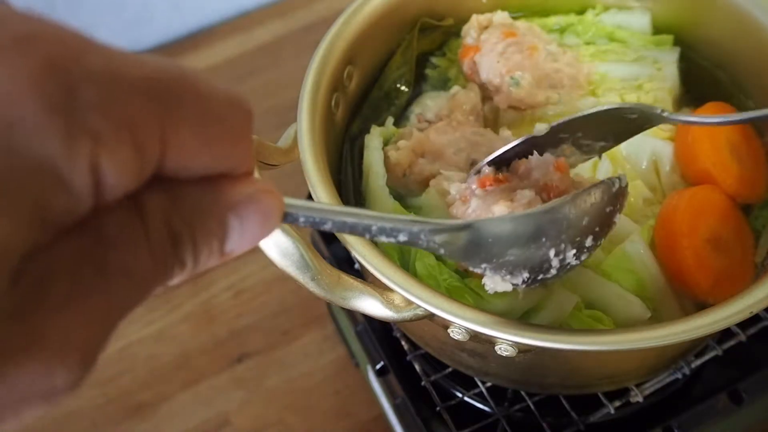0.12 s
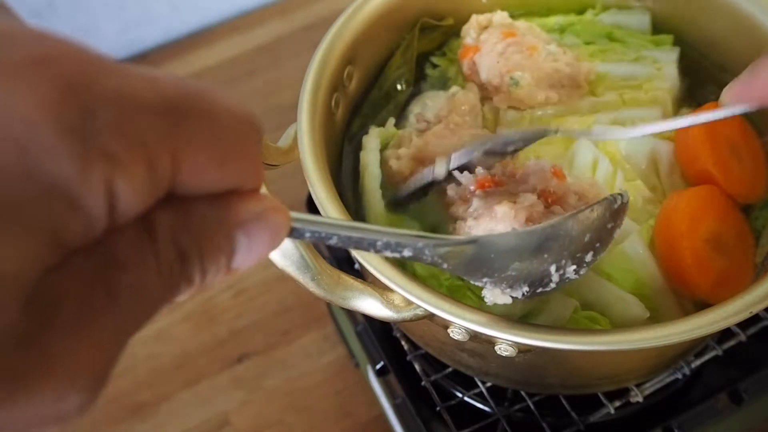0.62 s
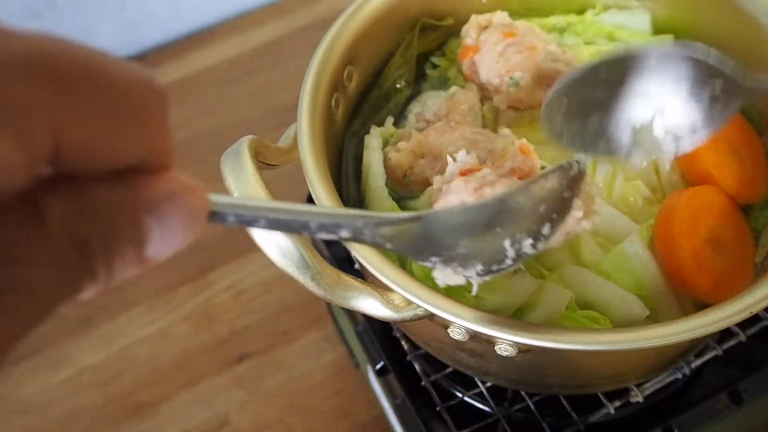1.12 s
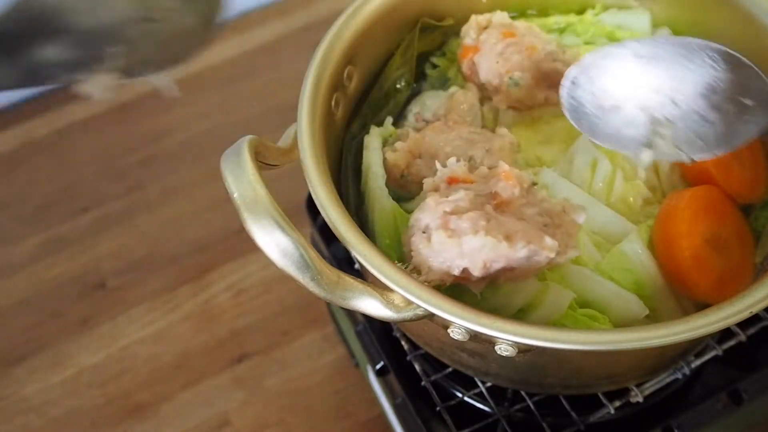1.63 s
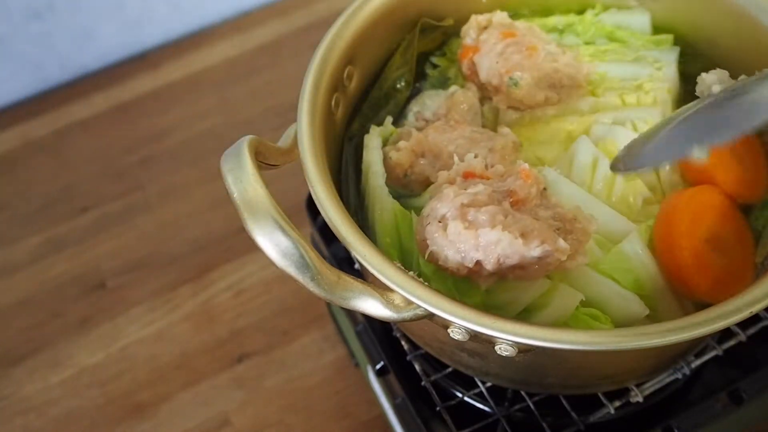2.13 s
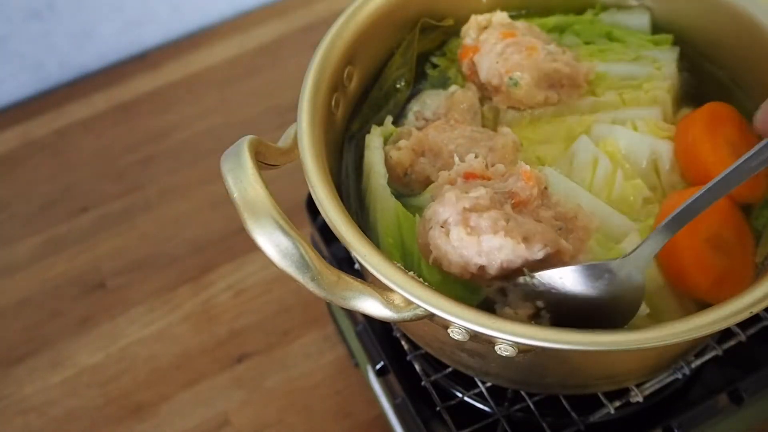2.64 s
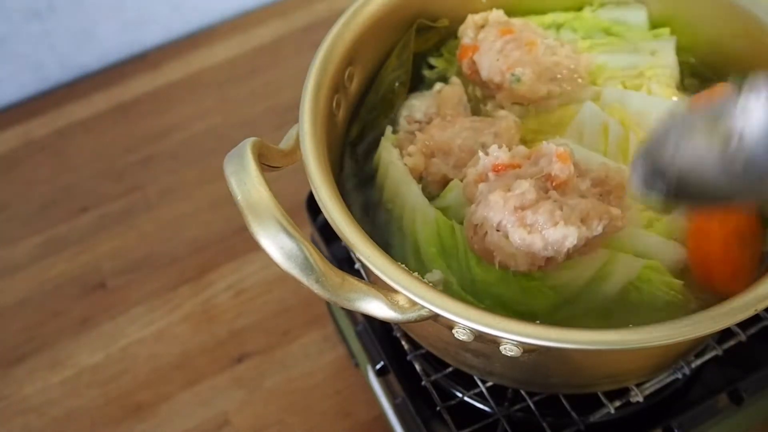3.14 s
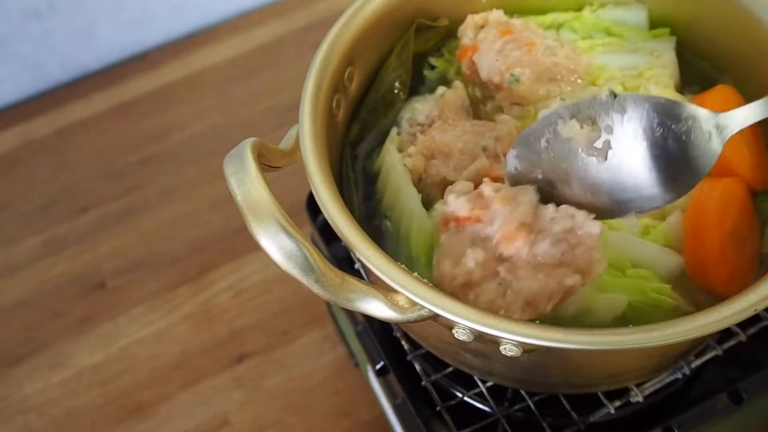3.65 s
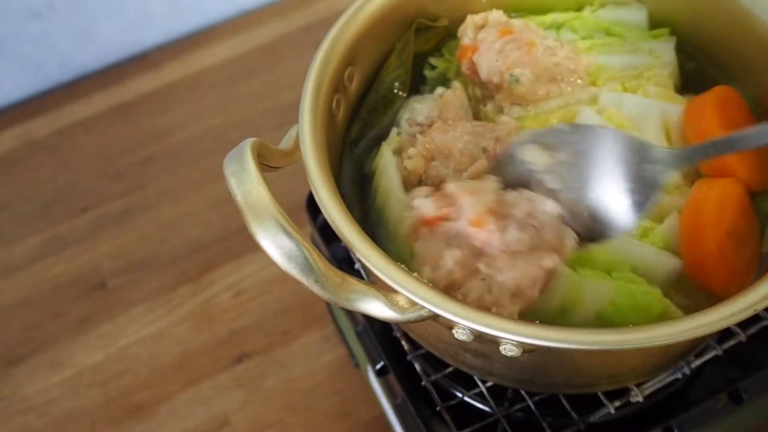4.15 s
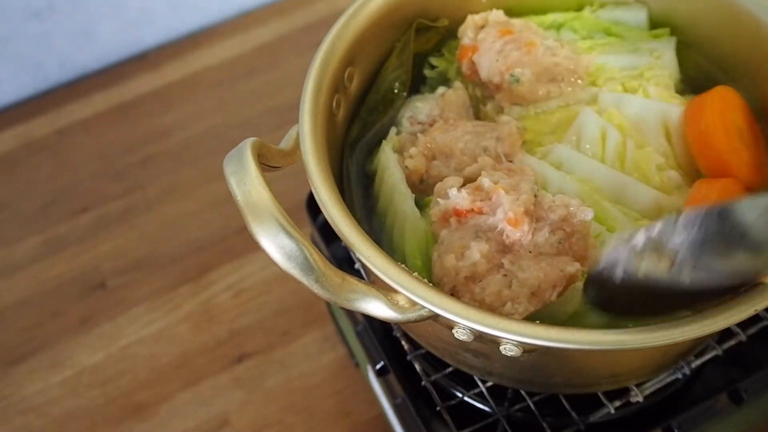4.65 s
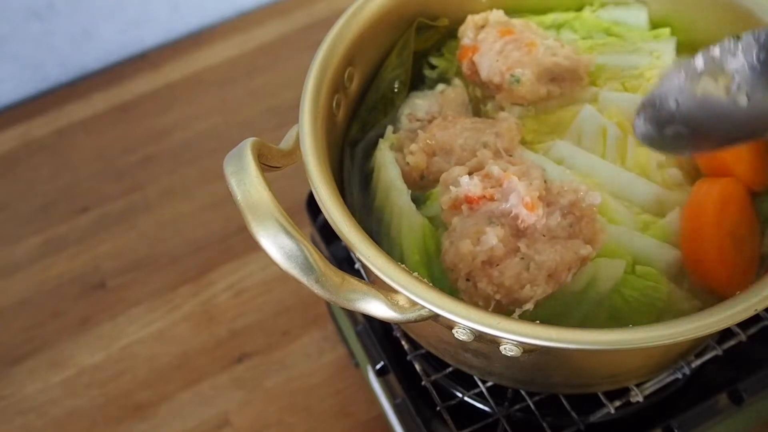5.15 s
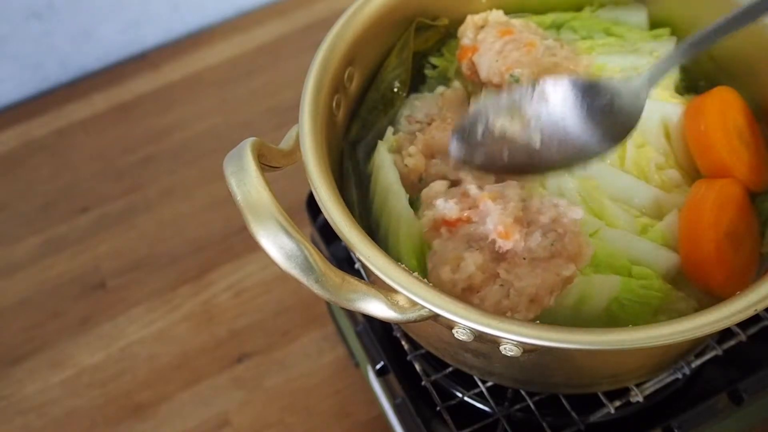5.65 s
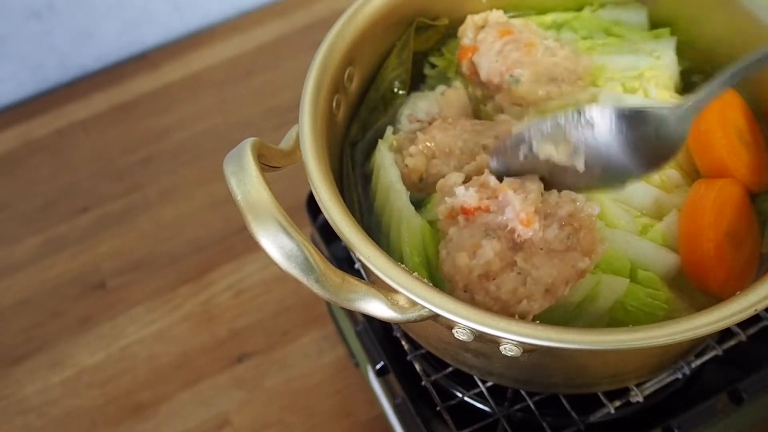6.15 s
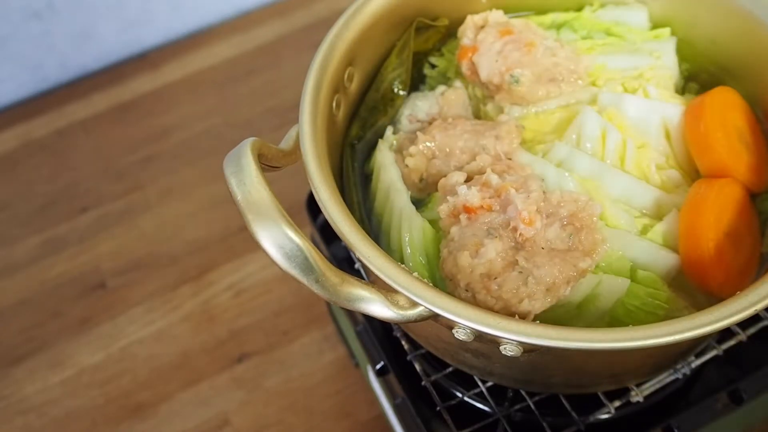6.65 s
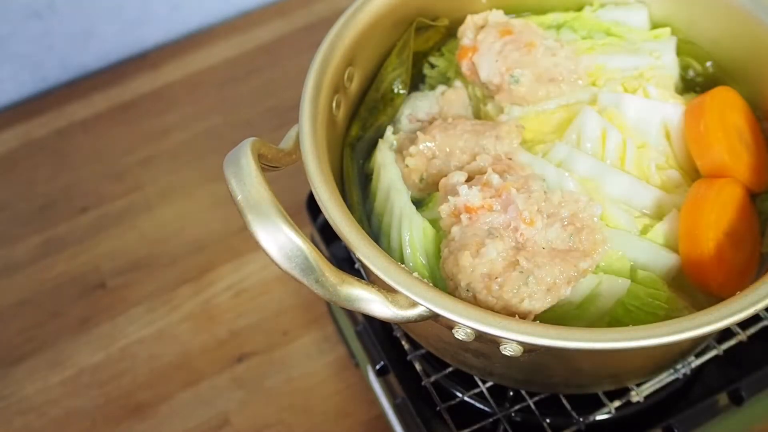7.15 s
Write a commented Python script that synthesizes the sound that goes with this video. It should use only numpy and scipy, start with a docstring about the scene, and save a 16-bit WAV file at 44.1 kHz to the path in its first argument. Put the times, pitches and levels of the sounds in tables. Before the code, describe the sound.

Close to a small pot simmering over a gas flame: steady low roar, tiny pops, and a few spoon scrapes and sharp metallic knocks.

```python
"""Simmering pot on a gas burner

Vegetables come to a simmer over a tabletop burner, heard from close by. The flame roars low as filtered
noise, gas jets whistle faintly as narrow noise bands, and bubbles pop as short damped oscillations.
A metal spoon knocks the aluminium wall and another spoon, which ring as sums of decaying modes;
its scrapes along the inside are stick-slip noise through the resonances of the hollow pot, with grit above.
"""
import sys
import numpy as np
from scipy import signal
from scipy.fft import rfft, irfft
from scipy.io import wavfile
from scipy.ndimage import uniform_filter1d

SR = 44100
rng = np.random.default_rng(int(sys.argv[2]) if len(sys.argv) > 2 else 0)


def pcm_store(signal):
    """Save signal as 16-bit PCM."""
    levels = np.round(np.clip(np.atleast_2d(signal), -1, 1) * 32767)
    wavfile.write(sys.argv[1], SR, levels.astype(np.int16).T)


def makeup_ratio(level_db):
    """Linear amplitude ratio for a level in decibels (20 dB per factor of ten)."""
    decades = np.asarray(level_db, float) / 20
    return 10 ** decades


N = 321048

# Flame roar and simmer hiss before flicker, with an upper cut-off at 16 kHz:
# f/Hz, left level/dB per Hz, right level/dB per Hz, likeness/0-1
FLAME_SPECTRUM = [(25, -87, -87, 0.7), (58.7, -78.5, -75.5, 0.4), (103, -72, -74, 0.82),
                  (148, -66, -66, 0.95), (240, -84.5, -87.5, 0.45), (308, -83.5, -83, 0.47),
                  (673, -87.5, -89, 0.6), (752, -80.5, -79.5, 0.38), (934, -83.5, -81.5, 0.52),
                  (1245, -88, -87, 0.26), (2070, -91, -91.5, 0.52), (2400, -95, -95.5, 0),
                  (2680, -93.5, -93, 0.1), (3600, -91, -92.5, 0), (5900, -97, -97, 0.19),
                  (7050, -92.5, -93.5, 0.24), (9400, -93, -98, 0), (12700, -99, -93, 0),
                  (12800, -101, -105, 0.4), (14000, -87, -80, 0.27), (14400, -102, -94, 0.3),
                  (15800, -99, -99, 0.2), (16000, -125, -125, 0.1)]
# Slow small wavering of the pot's hum: t/s, level change/dB
HUM_WAVER = [(0, -0.5), (2.5, 0.5), (4.501, -1), (5, 0), (7.3, 1)]
# Turbulence ringing in the gas jets: f/Hz, width at half amplitude/Hz, left and right relative level/dB per Hz,
# phase by which the left leads/rad
JET_BANDS = [(6360, 67, -72, -85, 6.5), (6400, 40, -77, -79, 1.5), (6828, 51, -76.5, -73.5, 1.5),
             (6942, 54, -67, -96, 3.5), (8210, 58, -71, -102, -2), (8240, 31, -71.5, -106, -2.5)]
# Bursting bubbles: t/s, level/dB, centre f/Hz, spread/octaves
CLEAR_POPS = [(0.0625, -24, 8000, 1.2), (.1753, -25, 9100, 0.6), (0.183, -32.5, 1590, 0.67),
              (0.393, -29, 10300, 0.38), (0.7652, -22, 10500, 0.31), (0.774, -33, 9500, .2),
              (.7805, -32, 12500, 0.28), (.7999, -32, 12400, 0.42), (0.885, -27, 8650, 0.7),
              (.8849, -32, 1410, 0.8), (.9524, -31, 9300, .35), (1.131, -27.5, 8400, 0.39),
              (1.2551, -28, 13000, .25), (1.292, -35, 6200, .4), (1.4585, -29, 9700, 0.74),
              (1.475, -14, 11000, 0.51), (1.4805, -39, 11500, .25), (1.4845, -30, 10500, .3),
              (1.7313, -25.5, 8450, .35), (1.769, -23, 10800, 0.48), (1.8787, -33, 12400, .3),
              (2.1481, -30, 11100, 0.44), (2.3042, -26, 9100, 0.31), (2.3564, -37, 2400, 0.7),
              (2.7882, -23, 10700, 0.32), (2.8842, -30, 7900, 0.18), (3.1169, -29, 13100, 0.29),
              (3.1418, -28, 1680, 0.65), (3.2798, -26, 13700, .2), (3.3516, -26.5, 3420, 1.2),
              (3.5304, -25.5, 9200, 1.2), (3.9976, -37, 1690, 0.46), (4.1789, -26, 8600, 1.1),
              (4.2351, -28.5, 9400, 0.38), (4.491, -39, 5000, 0.57), (4.6247, -30.5, 3600, 0.65),
              (4.7015, -33, 13200, 0.12), (4.9215, -27.5, 6500, 1.5), (5.787, -31, 7100, .45),
              (5.9, -43.5, 1340, 0.2), (5.925, -30, 11700, .3), (6.0665, -28, 11800, .4),
              (6.2854, -25, 12800, 0.26), (6.4084, -35, 3870, 0.36), (6.43, -40.5, 800, 0.22),
              (6.57, -44, 590, 0.21), (6.699, -31, 11000, 0.28), (6.8965, -33, 12200, .4),
              (7.0842, -34, 12800, 0.28), (7.14, -41.5, 2000, 0.26)]
# Spoon blows on the pot wall: t/s, level/dB, brightest f/Hz, fall from there/dB per octave, contact time/s
WALL_BLOWS = [(1.186, -25, 780, 35, 0.005), (1.2435, -33, 800, 35, .004), (2.541, -22, 520, 10, .008),
              (2.582, -28, 750, 14, .004), (2.9205, -30, 700, 20, .006), (5.548, -36, 900, 30, .004),
              (2.5324, 8, 5600, 3.5, .0008), (2.835, -27, 1600, 20, 0.0012),
              (4.6868, -11, 2100, 6.5, 0.0017)]
# Modes of the pot wall: f/Hz, level/dB, t60 before contact damping/s
WALL_MODES = [(450, -18, .07), (760, -15, .06), (950, -15, .05), (1560, -4, .04), (1980, -7, .03),
              (2750, -10, .02), (3720, 0, .03), (4150, -5, .025), (4550, -4, .025), (4860, -5, .04),
              (5750, -6, .03), (6350, -7, .02), (6800, -5, .02), (7400, -8, .025), (9400, -9, .025),
              (10300, -9, .02), (12400, -6, .02), (13880, -9, .035)]
# Blows that ring the spoon itself: t/s, level/dB, brightest f/Hz, fall from there/dB per octave, contact time/s
SPOON_BLOWS = [(.758, -38, 2100, 120, 0.01), (.770, -36, 2100, 120, .01), (1.184, -29, 6000, 50, .006),
               (1.24, -35, 6000, 30, .008), (2.7252, -14, 6000, 0, 0.0025), (4.6866, -25, 13880, 70, .004)]
# Modes of the spoon: f/Hz, level/dB, t60 before contact damping/s
SPOON_MODES = [(2250, -12, .04), (2550, -6, .05), (3480, -2, .09), (5600, -22, .04), (6200, -18, .05),
               (7100, -12, .1), (7960, -8, .09), (8550, -3, .09), (9500, -3, .1), (9850, -1, .07),
               (10100, 0, .11), (10850, -6, .05), (13880, -24, .06)]
# Drags along the wall: start t/s, press-in/s, hold/s, hollow level/dB, grit level over hollow/dB
WALL_DRAGS = [(0.743, 0.012, 0.023, -56.5, 5), (1.175, 0.0064, 0.019, -43.5, -6),
              (1.238, 0.005, 0.018, -47.5, -8.5), (2.532, .004, 0.042, -41, 5.5),
              (2.599, .01, 0.032, -60, 6), (2.725, 0.0033, 0.0043, -45, 7.5), (2.796, 0.059, 0.024, -42, 0),
              (2.86, 0.0092, 0.054, -42.5, -9), (4.685, 0.0011, 0.0039, -39, 6)]
# Resonances of the hollow pot: f/Hz, nominal width/Hz, relative level/dB
HOLLOW_MODES = [(150, 28, 5.5), (345.5, 30, 1), (464, 125, -3.5), (774, 146, 4.5), (918, 230, -1.5),
                (1430, 75, -13)]
# Spectrum of the fine grit: f/Hz, relative level/dB per Hz
GRIT_SPECTRUM = [(880, -13), (1500, 3), (2140, -4), (3000, -0.5), (3600, 3), (4700, 2), (5600, -4.5),
                 (7170, 1), (11700, -9), (13900, -9), (16000, -60)]
# Two microphone ports differ in balance and phase with pitch, for all near sounds:
# f/Hz, left minus right level at full share/dB, phase by which left leads (spoon and wall only)/rad
PORT_BALANCE = [(1000, 0.5, 0.34), (2980, -1.5, 0.71), (5000, 1, 0.55), (6900, 2, 0.43), (8600, 13, 2.8),
                (11000, 4, 0.41), (14100, -20, 7.6)]

HZ = np.maximum(np.fft.rfftfreq(N, 1 / SR), 1)
SIDES = np.array([[1], [-1]])  # left, right
TOP_HZ = 16000


def unit(x):
    """Normalization: scale to rms 1."""
    return x / np.sqrt(np.mean(x ** 2))


def white(*shape):
    """Flat spectral density: spectrum of noise at 0 dB per Hz."""
    return rfft(rng.standard_normal((*shape, N))) * np.sqrt(SR / 2)


def along(table, column):
    """Interpolation on a logarithmic frequency axis: one column read at every frequency."""
    table = np.array(table)
    return np.interp(np.log(HZ), np.log(table[:, 0]), table[:, column])


def walk(rate_hz):
    """Slow random modulation: levels held 1 / rate_hz and slewed twice, with spread near 1."""
    hold = int(SR / rate_hz)
    steps = np.repeat(rng.standard_normal(N // hold + 1), hold)
    return 1.33 * uniform_filter1d(uniform_filter1d(steps, hold), hold)[:N]


def add(out, s, sound, pan_db):
    """Superposition: add a short sound at time s, panned by a level difference."""
    i = int(s * SR)
    sound = sound[:N - i]
    out[:, i:i + len(sound)] += sound * makeup_ratio(SIDES * pan_db / 2)


def kitchen(x):
    """Reverberation: close surfaces return a short, exponentially decaying wash."""
    level_db, t60_s = -16, 0.06
    t = np.arange(SR // 4) / SR
    tail = rng.standard_normal((2, len(t))) * makeup_ratio(-60 * t / t60_s) * (t > 0.002)
    tail = tail / np.sqrt(np.sum(tail[0] ** 2))
    return x + makeup_ratio(level_db) * signal.fftconvolve(x, tail, axes=1)[:, :N]


def ports(x, lean):
    """Receiver response: balance (scaled by lean) and phase between the ports change with pitch."""
    balance = makeup_ratio(SIDES * lean * along(PORT_BALANCE, 1) / 2)
    phase = np.exp(0.5j * SIDES * along(PORT_BALANCE, 2))
    return irfft(rfft(x) * balance * phase, N)


def flame():
    """Combustion noise: broad and partly coherent between sides; each register flickers alone."""
    alike = np.clip(along(FLAME_SPECTRUM, 3), 0, 1)
    shared, own = white(), white(2)
    levels = makeup_ratio([along(FLAME_SPECTRUM, 1), along(FLAME_SPECTRUM, 2)])
    noise = (np.sqrt(alike) * shared + np.sqrt(1 - alike) * own) * levels
    s, waver_db = np.transpose(HUM_WAVER)
    hum_db = np.interp(np.arange(N) / SR, s, waver_db)
    roar = irfft(noise * (HZ < 250), N) * makeup_ratio(0.75 * walk(11))
    hum = irfft(noise * ((HZ >= 250) & (HZ < 1200)), N) * makeup_ratio(hum_db + walk(16))
    hiss = irfft(noise * (HZ >= 1200), N) * makeup_ratio(walk(40))
    return roar + hum + hiss


def jets():
    """Resonant turbulence: narrow noise bands, partly the same on both sides at another phase."""
    out = 0
    for hz, width, left_db, right_db, lead in JET_BANDS:
        peak = 1 / (1 + ((HZ - hz) / (width / 2)) ** 2)
        noise = 0.42 * white() * np.exp(0.5j * lead * SIDES) + 0.32 * white(2)
        out = out + noise * peak * makeup_ratio([[left_db], [right_db]])
    return irfft(out, N) * makeup_ratio(1.6 * walk(7.5))


def pop(hz, octaves):
    """Damped oscillation: a film bursts in a few cycles or more, fewer the wider the spread."""
    t = np.arange(SR // 100) / SR
    tau = 0.28 / (hz * np.clip(octaves, 0.08, 1.5))
    shape = np.sin(2 * np.pi * hz * t) * t * np.exp(-t / tau)
    return shape / np.abs(shape).max()


def bubbles():
    """Random bursting: clear pops, and a scatter of faint, mostly high ones with a long tail of sizes."""
    small_pops_per_s, smallest_db = 65, -46.5  # the level at 14 kHz; lower pops are weaker
    out = np.zeros((2, N))
    for s, db, hz, octaves in CLEAR_POPS:
        add(out, s - 0.0002, makeup_ratio(db) * pop(hz, octaves), 0)
    for when, size, pitch, side in rng.random((int(small_pops_per_s * N / SR), 4)):
        hz = 14000 * 2 ** (-3.5 * pitch ** 4)
        level = makeup_ratio(smallest_db - 3.1 * np.log(1 - 0.98 * size)) * hz / 14000
        add(out, when * N / SR, level * pop(hz, 0.18), 8 * (side - 0.5))
    # the water surface gets a share of the ports' balance
    balance = makeup_ratio(SIDES * 0.79 * along(PORT_BALANCE, 1) / 2)
    # the left port lies a little further from the water: 1.05 samples
    delay = np.exp(-1j * np.pi * HZ * SIDES * 1.05 / SR)
    return irfft(rfft(out) * balance * delay, N)


def drag(t, press_s, hold_s, fade_db_per_s):
    """Contact pressure sets the level: press in, hold, then fade as the spoon lifts."""
    touch_db = -13.5  # first touch, under full pressure
    press_db = touch_db * (1 - np.clip(t / press_s, 0, 1))
    lift_db = -fade_db_per_s * (t - press_s - hold_s)
    return (t > 0) * makeup_ratio(np.clip(np.minimum(press_db, lift_db), -99, 0))


def scrapes():
    """Stick-slip excitation: uneven slips drive the hollow, which builds late and rings on; grit hisses above."""
    t = np.arange(N) / SR
    body, grit = np.zeros(N), np.zeros(N)
    for s, press_s, hold_s, hollow_db, grit_db in WALL_DRAGS:
        lag_s = 0.091 * (press_s + hold_s)  # the hollow peaks later than the grit
        body += makeup_ratio(hollow_db) * drag(t - s, press_s + lag_s, hold_s - lag_s, 337)
        grit += makeup_ratio(hollow_db + grit_db) * drag(t - s, press_s, hold_s, 900)
    slips = rng.standard_normal(N) * makeup_ratio(3.5 * walk(250))
    response = sum(makeup_ratio(db) / (1 + 1j * (HZ ** 2 - hz ** 2) / (HZ * 0.99 * width)) ** 2
                   for hz, width, db in HOLLOW_MODES)
    hollow = unit(irfft(rfft(slips * body) * response, N)) * np.sqrt(np.mean(body ** 2))
    fine = rfft(slips + 1.1 * rng.standard_normal((2, N))) * makeup_ratio(along(GRIT_SPECTRUM, 1))
    return hollow + grit * unit(irfft(fine, N))


def blows(table, modes, crack_db):
    """Modal excitation: a sharp push and weaker rattle ring modes near the brightest pitch, under a dry crack."""
    out, t = np.zeros((2, N)), np.arange(SR // 8) / SR
    for s, db, bright_hz, fall_db, contact_s in table:
        rattle = rng.standard_normal(len(t)) * np.exp(-t / contact_s)
        push = 0.22 * rattle / np.sqrt(np.sum(rattle ** 2)) + (t == 0)
        ring = 0
        for hz, mode_db, t60 in modes:
            level = makeup_ratio(mode_db - fall_db * abs(np.log2(hz / bright_hz)))
            ring = ring + level * np.sin(2 * np.pi * hz * t) * makeup_ratio(-60 * t / t60)
        # the metals stay touching for a moment, which drains most of the ring at once
        ring = ring * (0.22 + 0.78 * np.exp(-t / (3 * contact_s)))
        body = signal.fftconvolve(push, ring)[:len(t)] / np.abs(ring).max()
        band = signal.butter(2, [bright_hz / 2, min(bright_hz * 2, TOP_HZ)], "band", fs=SR, output="sos")
        crack = signal.sosfilt(band, rattle)
        # shorter contacts crack louder
        crack_level = makeup_ratio(crack_db) * (0.001 / contact_s) ** 2
        sound = body + crack_level * crack / np.abs(crack).max()
        # a longer contact swells in more gently
        sound = sound * (1 - np.exp(-t / (0.2 * contact_s)))
        # each blow is thinned well below its brightest pitch
        thin = signal.butter(2, bright_hz / 6, "high", fs=SR, output="sos")
        add(out, s, makeup_ratio(db) * signal.sosfilt(thin, sound), 0)
    return out


def scene():
    """Superposition of sources: a steady burner under the near events, which alone get the wash."""
    wall = ports(blows(WALL_BLOWS, WALL_MODES, -7), 0.42)  # the wide wall gets less of the ports' balance
    spoon = ports(blows(SPOON_BLOWS, SPOON_MODES, -6) + scrapes(), 1)
    return flame() + jets() + kitchen(wall + spoon + bubbles())


def top_cut(x):
    """Nothing passes above the cut-off."""
    return signal.sosfilt(signal.butter(12, 16820, fs=SR, output="sos"), x)


def record(dry):
    """Saturation and band limiting: the loudest knock is rounded off, the top cut, a constant offset added."""
    soft = dry / (1 + (dry / 0.93) ** 4) ** 0.25
    low_pass = signal.ellip(8, 0.2, 70, TOP_HZ, fs=SR, output="sos")
    mix = signal.sosfilt(low_pass, soft) - 0.0045
    return top_cut(mix)


dry = scene()
out = record(dry)
pcm_store(out)
```